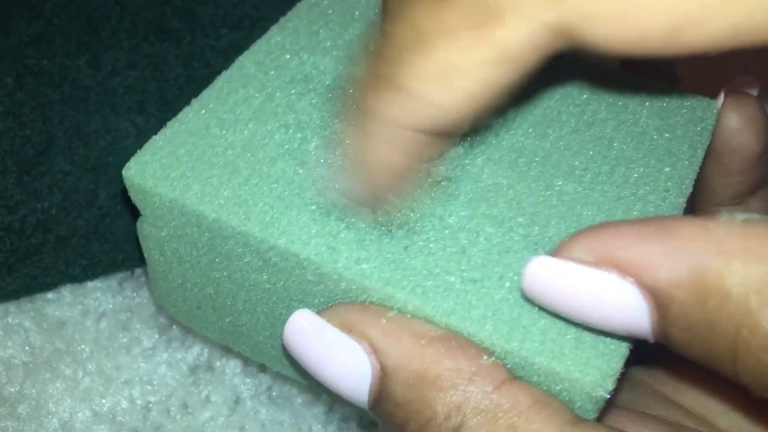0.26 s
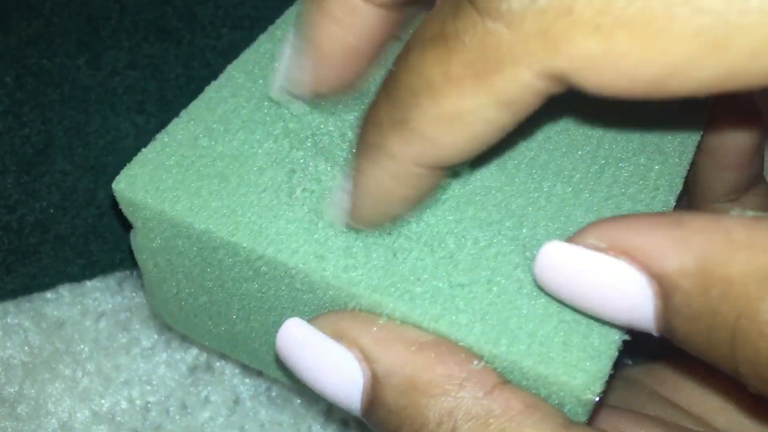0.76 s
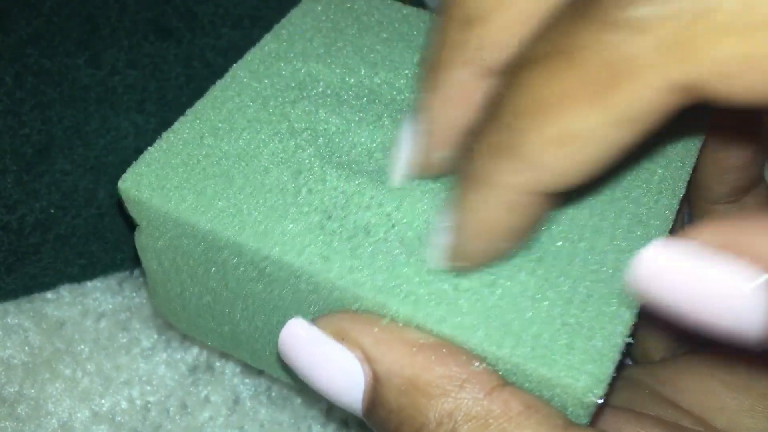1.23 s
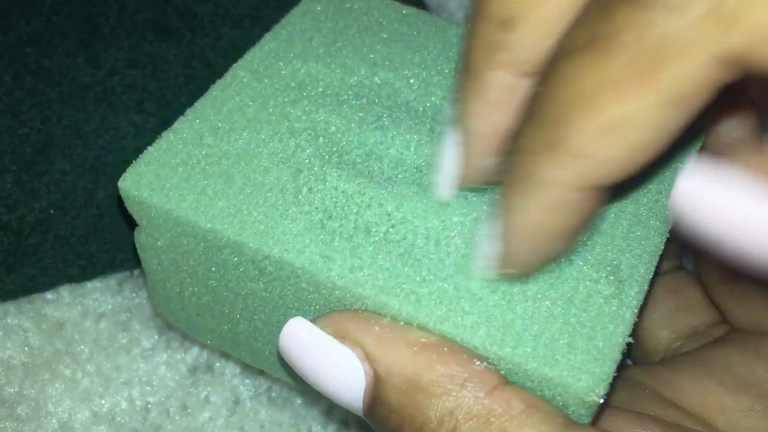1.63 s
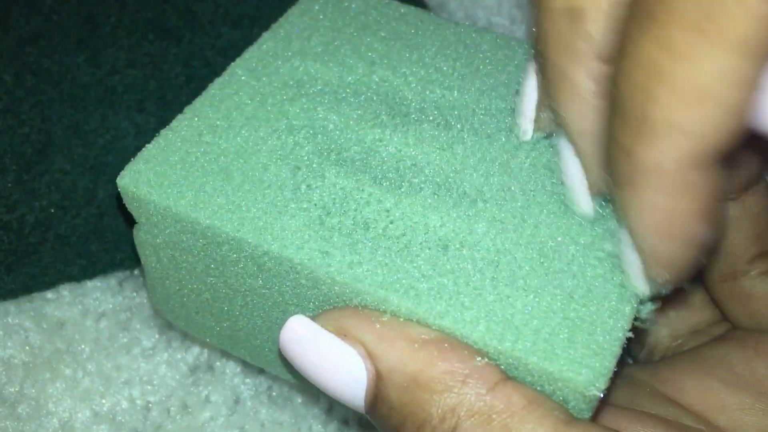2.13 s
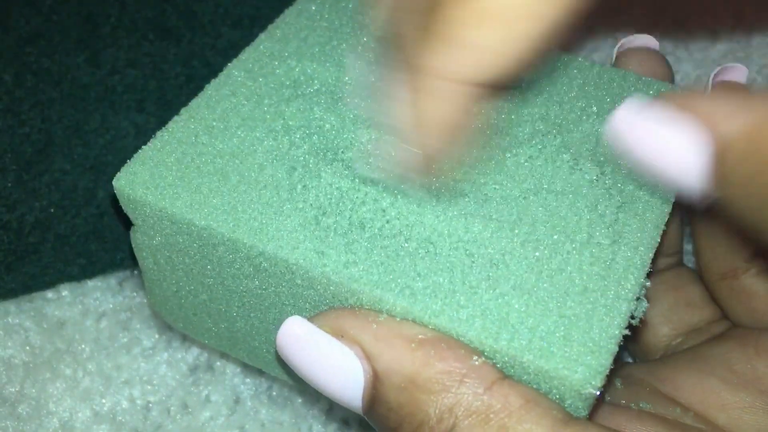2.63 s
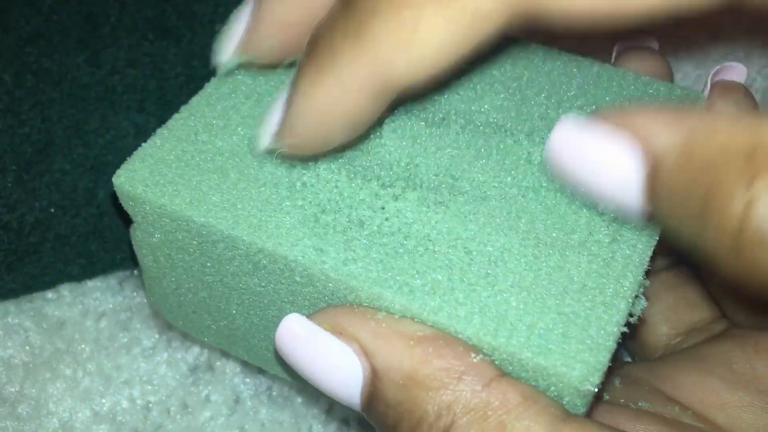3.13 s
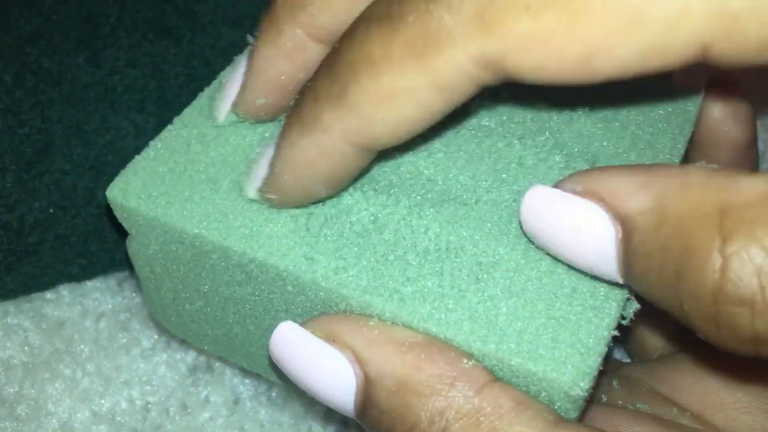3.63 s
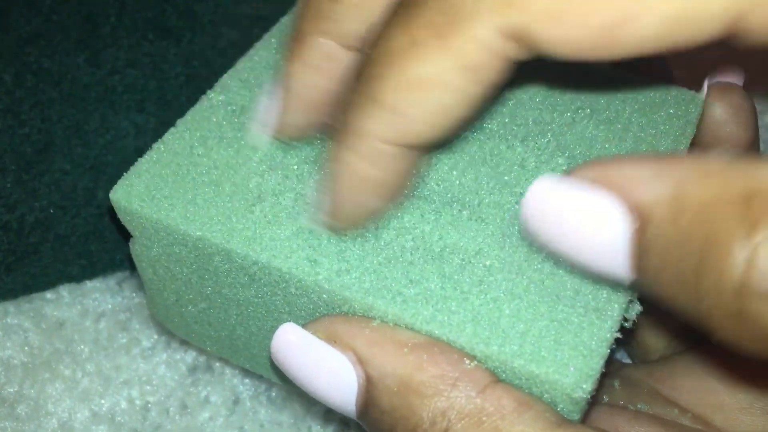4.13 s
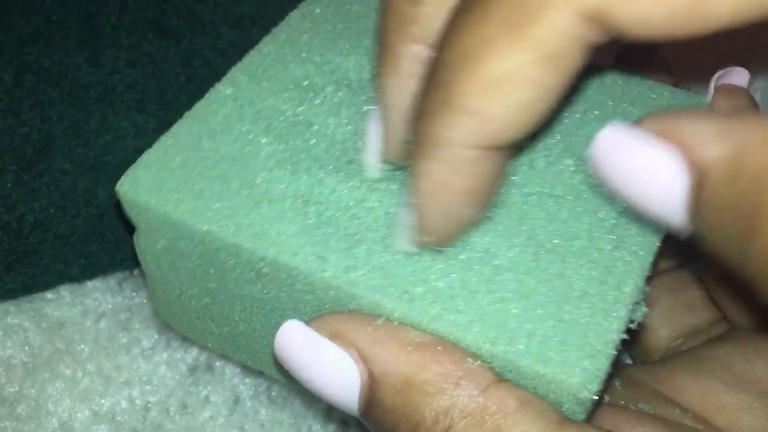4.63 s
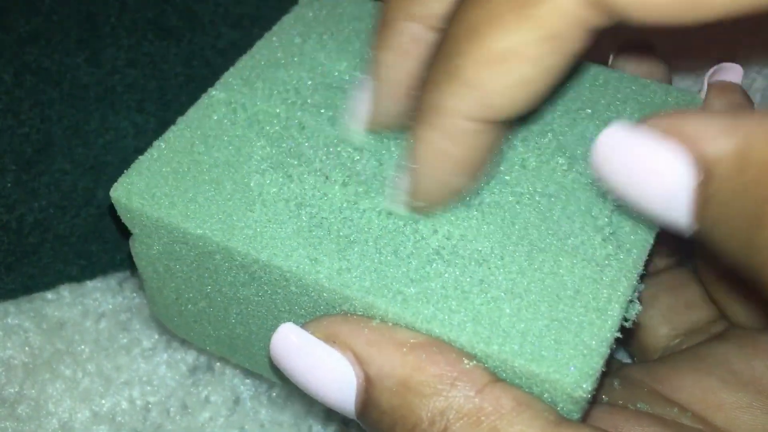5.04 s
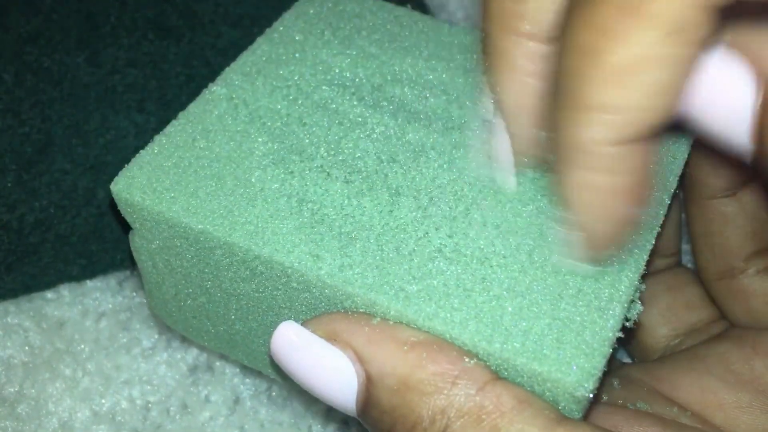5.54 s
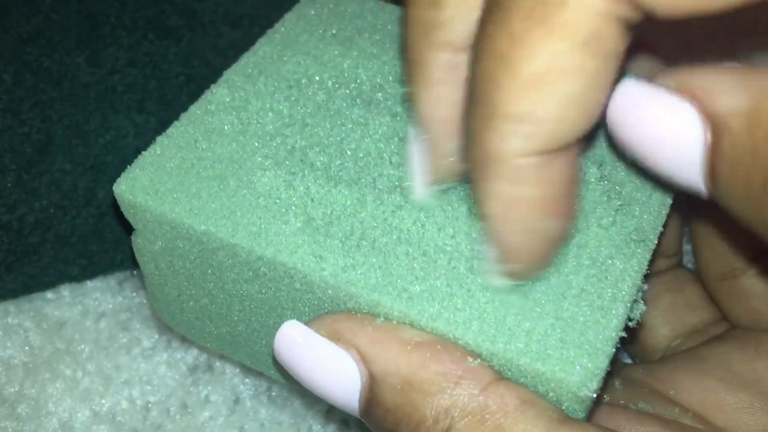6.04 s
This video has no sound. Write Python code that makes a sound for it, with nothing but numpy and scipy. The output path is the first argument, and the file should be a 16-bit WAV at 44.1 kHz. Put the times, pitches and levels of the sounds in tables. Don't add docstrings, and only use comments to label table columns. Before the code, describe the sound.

Crisp, bright, sandy crackle of nails crushing brittle foam, heard close and nearly dry on one phone-like microphone. Short irregular jerks give way after a second to a regular run of raking strokes, each a tenth to a quarter of a second, separated by near-silent gaps with tiny brushes and ticks. The light block bumps dully against the holding hand; distant motors hum softly beneath a faint hiss.

```python
import sys
import numpy as np
from scipy import signal
from scipy.fft import rfft, irfft, next_fast_len
from scipy.io import wavfile
from scipy.ndimage import uniform_filter1d

SR = 44100
rng = np.random.default_rng(int(sys.argv[2]) if len(sys.argv) > 2 else 0)


def output_pcm(signal):
    pcm = np.clip(np.atleast_2d(signal).T, -1, 1) * 32767
    wavfile.write(sys.argv[1], SR, np.round(pcm).astype(np.int16))


def boost_factor(decibels):
    exponent = np.asarray(decibels, float) / 20
    return 10 ** exponent


N = 276934

# (f/Hz, density/dB)
CRUSH = [(88, -51), (150, -17), (255, -9), (460, -16.5), (560, -13), (847, -9.5), (2010, 1), (2260, -0.5),
         (3040, -3), (4870, 0), (7370, 0.5), (15000, 3.5), (16500, -8.5)]
# (f/Hz, width/Hz, boost/dB)
BLOCK = [
    (2057, 220, 4.5),
    (2976, 540, 4),
    (3990, 860, 4.5),
    (6140, 570, 3),
    (7240, 400, 3.5),
    (9320, 1600, 5),
    (10900, 700, 2.5),
]
# (f/Hz, width/Hz, level/dB)
HOLLOWS = [
    (2285, 300, -2),
    (3670, 690, -2.5),
    (4890, 200, -5),
    (10430, 380, -6),
]


def nails():
    # (f/Hz, width/Hz)
    hand_rings = [
        (2710, 330),
        (3300, 260),
        (5870, 420),
        (7500, 620),
        (11100, 1300),
        (4320, 350),
    ]
    gain, tints = pressure()
    thuds = landings(gain)
    size = next_fast_len(N)
    f = np.arange(size // 2 + 1) * SR / size
    spectrum = rfft(cells(), size)
    below = [1 / (1 + (f / hz) ** 12) for hz in (1650, 2400, 8000)]
    shares = np.diff([0 * f, *below, 1 + 0 * f], axis=0)
    parts = [irfft(spectrum * share, size)[:N] for share in shares]
    crackle = sum(g * part / part.std() for g, part in zip(gain, parts))
    spectrum = rfft(crackle, size)
    tinted = 0
    for tint, (hz, width) in zip(tints, hand_rings):
        ring = irfft(spectrum / (1 + ((f - hz) / width) ** 4), size)[:N]
        tinted = tinted + (tint - 1) * ring
    return thuds + crackle + tinted


def landings(gain):
    # (t/s, peak level/dB, body over it/dB, crunch length/ms, thud over it/dB)
    hits = [(0.0973, -24, -2, 2.2, -17.5), (0.44, -21, -4, 2, -21), (1.1338, -39, -22, 3.0, -10),
            (1.1636, -31.5, -6, 2, -1.5), (1.5784, -18, -8, 4.9, -29), (1.5857, -34.5, -8, 3.2, -17),
            (1.992, -28, -10, 5.1, -22.5), (2.4008, -29.5, -3, 4.2, -15), (2.419, -23.5, -5, 3.7, -32),
            (2.798, -31.5, 2, 2, -14), (2.819, -24.5, -5, 1.7, -33), (3.2435, -63.5, -4, 3.0, 3),
            (3.277, -25, -3, 2.4, -29), (3.6503, -69.5, 7, 3.0, 17.5), (3.686, -22.5, -2.5, 3.2, -17.5),
            (3.706, -44, 5, 2.6, -12), (4.127, -42, -15, 5.1, -14), (4.541, -30, -2.5, 2.3, -18),
            (4.5468, -31, 5, 1.8, -36), (4.563, -35.5, -2, 2.4, -41), (4.9908, -29, -2.5, 2.03, -7.5),
            (5.4228, -26, -13, 3.3, -20), (5.894, -34.5, -6.5, 2.6, -4.5)]
    rustle_db, rustle_ms = -18, 3
    thud_hz, thud_ms = 240, 2.6
    t, thuds = np.arange(N) / SR, np.zeros(N)
    for s, db, body_db, length_ms, thud_db in hits:
        on = slice(int((s - .015) * SR), int((s + .08) * SR))
        since = t[on] - s
        age = np.maximum((since + 0.0012) * 1000 / length_ms + .4, 0) / 1.19
        crunch = (age * np.exp(1 - age)) ** 5.2
        crunch += boost_factor(rustle_db) * np.exp(-np.abs(since) * 1000 / rustle_ms)
        balance = boost_factor(np.array([[body_db], [body_db], [0], [1.5]]))
        gain[:, on] += boost_factor(db - 15) * crunch * balance
        knock_hz = thud_hz * np.sqrt(thud_ms / length_ms)
        swell = age * np.exp(1 - age / 0.76)
        thuds[on] += boost_factor(db + thud_db) * swell * np.sin(2 * np.pi * knock_hz * since)
    return thuds


def pressure():
    # (t/s, depth/dB, length/ms)
    hitches = [(.018, 8.5, 4), (0.128, 4, 2.5), (0.162, 0, 3), (.375, 2, 4), (.445, 13, 3), (.535, 3.5, 4),
               (1.159, 25, 5.6), (1.338, 3.5, 16), (1.81, 6.5, 11.7), (2.979, 4, 4), (3.44, 3, 5.5),
               (4.74, 4, 7.1), (5.19, 3, 8.4), (5.557, 2.5, 15), (5.6, 0.5, 5.7), (5.697, 11, 4.1)]
    t = np.arange(0, N / SR + .002, .001)
    stick_db = sum(db * np.exp(-((t - s) * 1000 / ms) ** 2) for s, db, ms in hitches)
    power, tint, total = 1e-12, 0, 1e-12
    for level_db, body_db, mode_db, dust_db, tints_db in contacts(t):
        shares = boost_factor(np.array([db + 0 * t for db in (body_db, mode_db, 0, dust_db)])) ** 2
        own = boost_factor(level_db - stick_db) ** 2
        power = power + own * shares / shares.sum(axis=0)
        total = total + own
        tint = tint + own * np.array([db + 0 * t for db in tints_db])

    def every_sample(rows):
        return np.array([np.interp(np.arange(N) / SR, t, row) for row in rows])
    return every_sample(np.sqrt(power)), every_sample(boost_factor(tint / total))


def contacts(t):
    yield from strokes(t)
    grit_db = 2.2 * walk(160)[::44][:len(t)]
    yield from scrubs(t, grit_db)
    yield from grazes(t, grit_db)


def strokes(t):
    # (bite t/s, hardest t/s, lift t/s, level/dB, fade before the lift/dB)
    pulls = [(0.905, 1.021, 1.078, -27.5, 18), (1.21, 1.31, 1.428, -26, 4),
             (1.628, 1.708, 1.841, -27.5, 6.5), (2.049, 2.077, 2.21, -25.5, 8.5),
             (2.446, 2.505, 2.625, -26.5, 8), (2.874, 2.97, 3.071, -23, 16),
             (3.332, 3.396, 3.525, -24.5, 10.5), (3.759, 3.825, 3.945, -26.5, 13),
             (4.178, 4.275, 4.385, -25.5, 11.5), (4.604, 4.657, 4.835, -25.5, 5.5),
             (5.045, 5.195, 5.27, -24, 9), (5.475, 5.52, 5.653, -25, 3), (5.941, 5.969, 6.165, -25.5, 10.5)]
    # (place at bite, place at lift, second mode at bite/dB, second mode at lift/dB)
    paths = [(0.45, 0, -1, -5.5), (0.27, 0.66, -5.5, 8.5), (0.87, 0.61, 1, 6.5), (.9, 0.13, 2, 6),
             (0.7, 0.43, -1, 7), (0.12, .7, -2, 3.5), (0, 0.86, -1, 2), (0.038, 0.64, -2, 2),
             (0, 0.43, -3, -1.5), (0, 0.9, -2.5, 3), (0.042, 1, -3, 5), (0.27, 1, 1, 5), (0, 0.97, -3, 3.5)]
    bite_db, bite_db_s, lift_db2_s, fade_power = 5.5, 1301, 9000, 2.14
    for (bite, hard, lift, db, fade_db), (here, there, from_db, to_db) in zip(pulls, paths):
        fade = np.clip((t - hard) / (lift - hard), 0, 1) ** fade_power
        level_db = touch(t, bite, hard, db - bite_db, db, bite_db_s, 0) - fade_db * fade
        level_db -= lift_db2_s / fade_db * np.maximum(t - lift, 0)
        place = np.interp(t, [bite, lift], [here, there])
        second_db = np.interp(t, [bite, lift], [from_db, to_db])
        high_db = -0.6 * second_db
        tints_db = second_db, 3 - 6 * place, 0, high_db, high_db, 0.31 * second_db
        body_db, mode_db, dust_db = -9.5 + 0.087 * second_db, -5 - 17.5 * place, -0.5 + 1.5 * place
        yield level_db, body_db, mode_db, dust_db, tints_db


def scrubs(t, grit_db):
    # (start t/s, end t/s, first level/dB, last level/dB, brightness/dB: + open, - cupped under the hand)
    jerks = [(0, 1.09, -45.5, -46.5, 0), (.003, 0.025, -29.5, -26, 3), (0.037, 0.068, -35.5, -40, 3),
             (0.098, 0.18, -38.5, -30.5, -1.5), (0.164, 0.25, -30, -33.5, -1), (0.263, 0.29, -30, -38.5, 2),
             (0.308, 0.4, -29, -38.5, 2.5), (0.405, 0.42, -31, -31, 3.5), (.447, .482, -34.5, -29, -1),
             (0.496, 0.57, -26.5, -31.5, -0.5), (.584, .632, -32, -30.5, 0), (0.636, .653, -26.5, -23, 3),
             (.664, .699, -24, -24, 3), (.72, .738, -36, -29, 2), (.758, 0.84, -39.5, -46, 1.5),
             (0.818, .881, -33, -30.5, 0.5), (1.131, 1.167, -40.5, -39, 0.5)]
    damp_db = -2.5
    for *row, bright_db in jerks:
        cup_db = 1.3 * (1.5 - bright_db)
        tints_db = damp_db, damp_db, cup_db, -.6 * cup_db, 0, 0.24 * cup_db
        level_db = touch(t, *row, 2499, 1800.5) + grit_db / 2
        yield level_db, -9.5, -12 + 1.1 * bright_db, bright_db, tints_db


def grazes(t, grit_db):
    # (start t/s, end t/s, first level/dB, last level/dB)
    brushes = [(1.184, 1.195, -48, -45), (1.442, 1.451, -38, -41), (1.464, 1.495, -37, -36),
               (1.494, 1.513, -36, -47), (1.593, 1.625, -55.5, -39), (1.862, 1.909, -45, -35),
               (1.998, 2.043, -49, -36.5), (2.228, 2.245, -49, -53), (2.249, 2.278, -47.5, -37),
               (2.408, 2.44, -51, -56), (2.632, 2.672, -42, -46.5), (2.801, 2.827, -45, -56),
               (2.86, 2.862, -53, -46), (3.1, 3.115, -63, -42.5), (3.287, 3.311, -45, -59),
               (3.693, 3.746, -60, -56), (4.131, 4.17, -55, -46), (4.422, 4.444, -37, -37),
               (4.541, 4.596, -52.5, -43), (4.994, 5.04, -49, -38), (5.299, 5.318, -47, -45.5),
               (5.425, 5.466, -57, -39), (5.674, 5.702, -43, -46.5), (5.706, 5.729, -50, -42),
               (5.905, 5.93, -50.5, -53)]
    for row in brushes:
        level_db = touch(t, *row, 2499, 1597) + grit_db
        yield level_db, -7, -12, -0.5, np.zeros(6)


def touch(t, start, end, first_db, last_db, rise, fall):
    slide_db = np.interp(t, [start, end], [first_db, last_db])
    return slide_db - rise * np.maximum(start - t, 0) - fall * np.maximum(t - end, 0)


def cells():
    cells_a_s, own_share = 12000, .45
    patch_db, flicker_db, slip_db, stick_db = .9, 1.6, 1.6, .35
    together, crush = snaps(cells_a_s), 0
    borders_hz = np.r_[100, 400, 750 * np.arange(1, 23)]
    for lo, hi in zip(borders_hz[:-1], borders_hz[1:]):
        sized = np.sqrt(1 - own_share) * together + np.sqrt(own_share) * snaps(cells_a_s / 3)
        patches = boost_factor(patch_db * walk(12) + flicker_db * walk(110))
        crush = crush + band(sized, lo, hi) * patches
    clumps = boost_factor(slip_db * walk(450) + stick_db * walk(70))
    return shape(crush * clumps, CRUSH, HOLLOWS + BLOCK)


def snaps(rate):
    x, breaks = np.zeros(N), rng.random(N) < rate / SR
    count = breaks.sum()
    spread_db = 2.5 * np.minimum(rng.exponential(size=count), 4)
    x[breaks] = rng.standard_normal(count) * boost_factor(spread_db)
    return x / x.std()


def cracks():
    # (t/s, peak level/dB)
    bursts = [(0.1263, -11), (0.135, -13), (0.168, -20), (0.1828, -6.5), (0.4394, -19), (0.5418, -10),
              (1.1648, -34), (1.503, -35), (2.268, -13.5), (2.401, -18.5), (2.413, -20), (2.7993, -22),
              (2.8194, -21), (3.0849, -31), (3.1178, -20.5), (3.2789, -15), (3.687, -21.5), (3.7063, -36),
              (4.1287, -24), (4.543, -22), (4.5473, -18), (4.5597, -30), (4.567, -21), (5.1179, -8),
              (5.2885, -15.5), (5.4288, -22), (5.895, -35), (5.908, -35), (5.9347, -18), (5.9717, -9)]
    x = np.zeros(N)
    s, db = np.transpose(bursts)
    x[(s * SR).astype(int)] = boost_factor(db - 2)
    click = shape(np.r_[1., np.zeros(N - 1)], CRUSH, HOLLOWS + BLOCK)[:400]
    return signal.fftconvolve(x, click / np.abs(click).max())[:N]


def pushes():
    # (t/s, level/dB, length/s)
    nudges = [(0.034, -49, .08), (.33, -57, .2), (0.494, -47.5, .15), (0.966, -46.5, .15),
              (1.247, -47, .07), (1.4, -59, .15), (1.606, -66, .06), (1.77, -54.5, .11), (2.11, -58, .08),
              (2.46, -55, .09), (2.588, -50, .06), (2.68, -59, .06), (2.823, -49, .06), (3.0, -67, .15),
              (3.34, -64, .1), (3.706, -52, .05), (3.858, -63, .2), (4.15, -57, .05), (4.32, -59.5, .1),
              (4.57, -47, 0.06), (4.77, -59, .15), (5.036, -56, .08), (5.32, -56, .15), (5.447, -46.5, .07),
              (5.65, -54, .06), (5.91, -48, .07), (6.157, -55, .1)]
    t = np.arange(0, N / SR + .002, .001)
    gain = 0
    for s, db, length in nudges:
        slope_db = np.where(t < s, 22, 17)
        gain = gain + boost_factor(db - np.abs(t - s) / length * slope_db)
    return waver(np.interp(np.arange(N) / SR, t, gain), 74, wobble_hz=5.5, rate=30)


def room_tail(close):
    t60_s = 0.14
    t = np.arange(SR // 2) / SR
    tail = rng.standard_normal(len(t)) * boost_factor(-60 * t / t60_s) * (t > .004)
    tail = signal.lfilter([1], [1, -.25], tail)
    return signal.fftconvolve(close, tail / np.sqrt(np.sum(tail ** 2)))[:N]


def motors():
    # (t/s, strength against the first/0-1)
    second_motor = [(0, .45), (.7, .8), (1.3, .5), (1.9, .85), (2.9, .65), (3.2, .12), (3.6, .12),
                    (4.0, .55), (4.9, .8), (5.2, .6), (5.4, .08), (6.28, .08)]
    beat_hz, beat_null_s = 1.875, .175
    t = np.arange(N) / SR
    second = np.interp(t, *np.transpose(second_motor))
    beat = np.abs(1 - second * np.exp(2j * np.pi * beat_hz * (t - beat_null_s)))
    return waver(boost_factor(-59) * beat, 119, wobble_hz=1.2, rate=9)


def quiet():
    # (f/Hz, density/dB)
    air = [(18, -30.5), (30, -21.5), (82, -5), (154, -10), (196, -18), (255, -22.5), (467, -34.5),
           (694, -33), (1000, -36.5), (1180, -34.5), (8990, -43.5), (15200, -50), (16500, -64.5)]
    return boost_factor(-58) * shape(rng.standard_normal(N), air) + boost_factor(-82.0) * rng.standard_normal(N)


def shape(x, table, dips=()):
    f = np.maximum(np.arange(2049) * SR / 4096, 1)
    table_hz, table_db = np.transpose(table)
    db = np.interp(np.log(f), np.log(table_hz), table_db)
    for hz, width, depth_db in dips:
        db = db + depth_db / (1 + (2 * (f - hz) / width) ** 2)
    cep = irfft(db * np.log(10) / 20)
    cep[1:2048] *= 2
    cep[2049:] = 0
    y = signal.fftconvolve(x, irfft(np.exp(rfft(cep))))[:N]
    return y / y.std()


def band(x, lo_hz, hi_hz):
    sos = signal.butter(2, [lo_hz, min(hi_hz, .45 * SR)], "band", fs=SR, output="sos")
    return signal.sosfilt(sos, x)


def walk(rate):
    k = int(SR / rate)
    held = np.repeat(rng.standard_normal(N // k + 2), k)[:N + k]
    w = uniform_filter1d(uniform_filter1d(held, k), k)[:N]
    return w / w.std()


def waver(gain, hz, wobble_hz, rate):
    phase = 2 * np.pi * np.cumsum(hz + wobble_hz * walk(rate)) / SR
    return np.sqrt(2) * gain * np.sin(phase)


def scene():
    close = nails() + cracks()
    mono = close + boost_factor(-19) * room_tail(close) + pushes() + motors() + quiet()
    return np.array([mono, mono])


def top_cut(x):
    return signal.sosfilt(signal.butter(12, 17060, fs=SR, output="sos"), x)


def record(dry):
    x = signal.sosfilt(signal.ellip(10, .2, 50, 15690, fs=SR, output="sos"), dry)
    instant = np.clip(1 - np.abs(np.arange(N) / SR - 1.365) / 0.017, 0, 1)
    late = np.roll(x[0], 999)
    side = sum(band(band(late, lo, hi), lo, hi) for lo, hi in ((8200, 9900), (13700, 15300)))
    side = side * instant * boost_factor(4.)
    return top_cut(x + np.array([side, -side]))


dry = scene()
out = record(dry)
output_pcm(out)
```